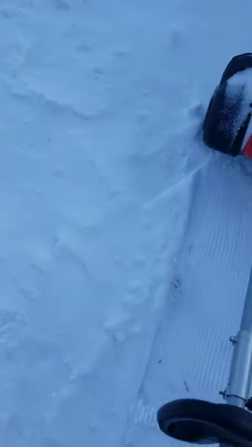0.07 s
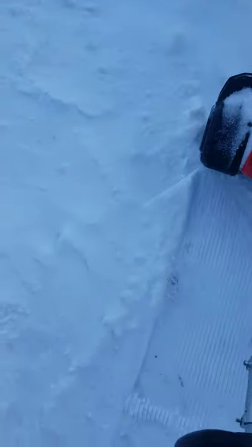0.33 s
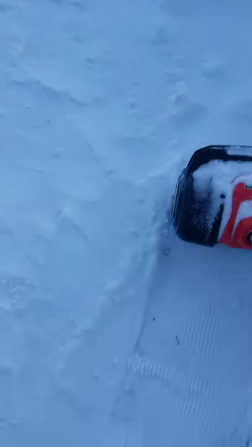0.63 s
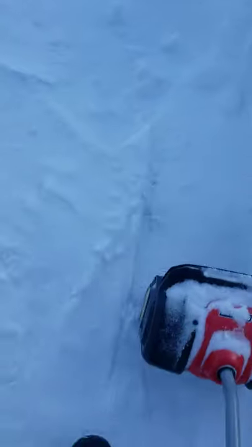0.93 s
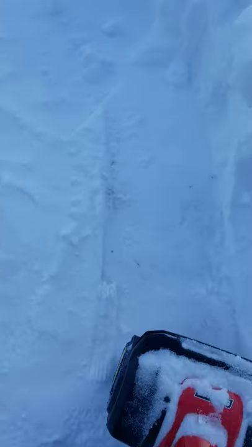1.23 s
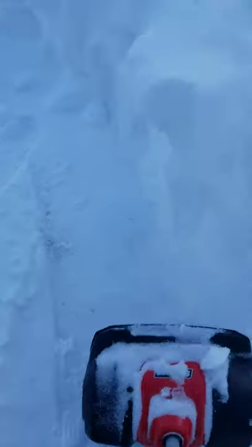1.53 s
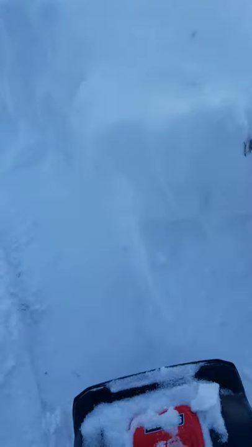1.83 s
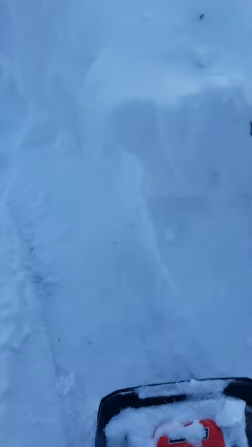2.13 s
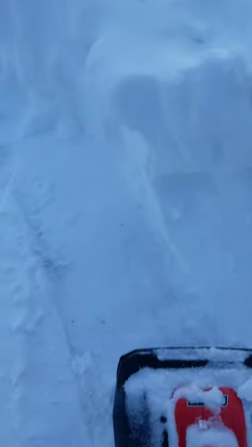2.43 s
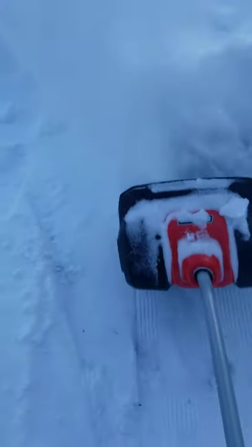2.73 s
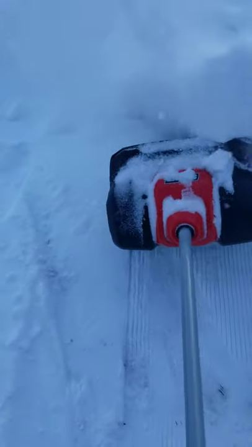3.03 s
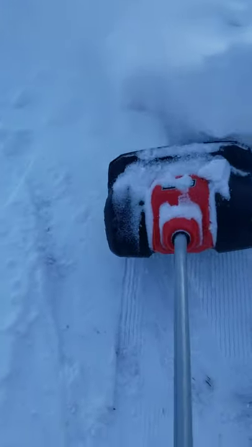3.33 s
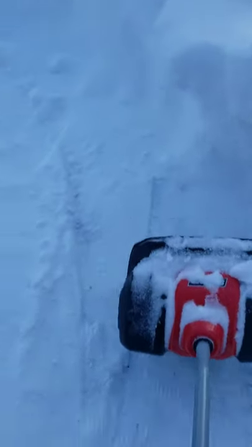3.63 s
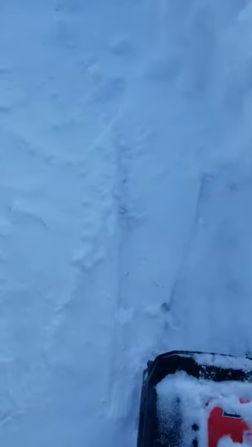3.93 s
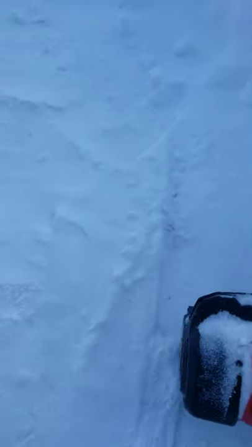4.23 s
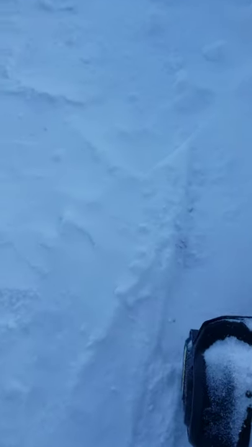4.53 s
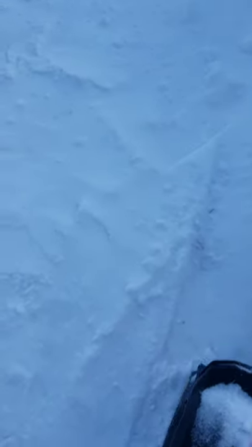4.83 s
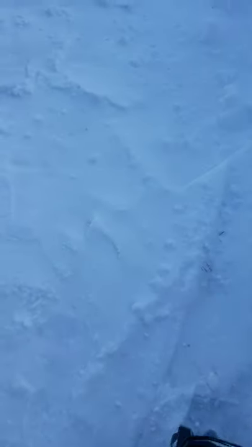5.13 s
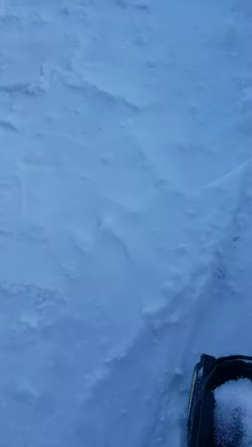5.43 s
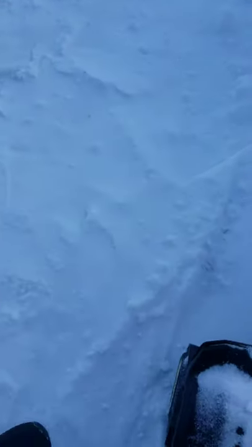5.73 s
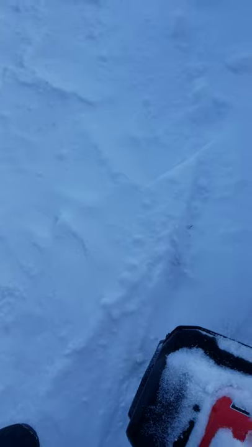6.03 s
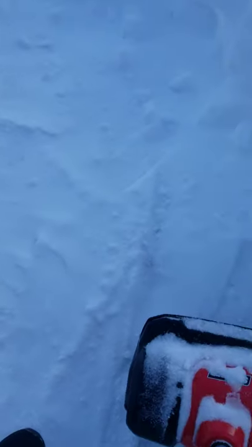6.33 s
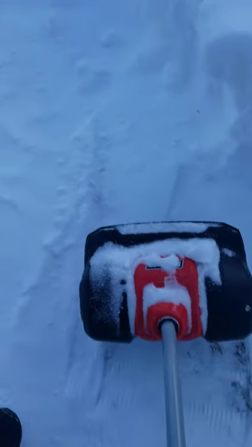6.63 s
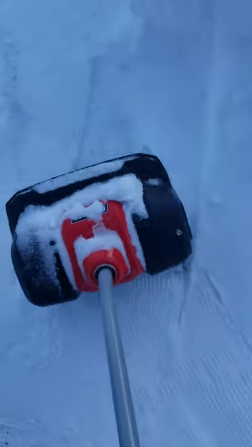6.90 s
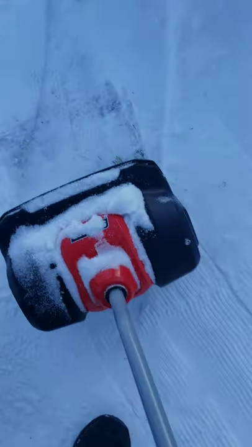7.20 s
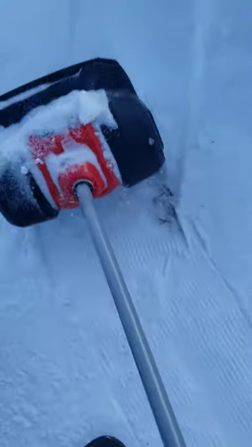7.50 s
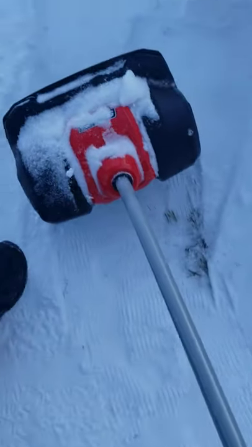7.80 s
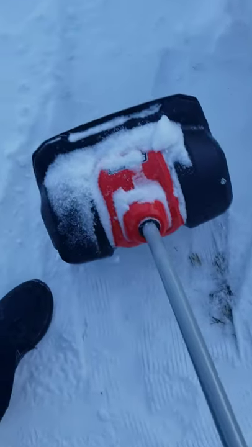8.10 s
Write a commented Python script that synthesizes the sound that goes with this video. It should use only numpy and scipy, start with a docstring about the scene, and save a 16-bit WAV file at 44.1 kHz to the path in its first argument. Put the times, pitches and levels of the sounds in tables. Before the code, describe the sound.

Close outdoors, a powered broom drones steadily while scraping snow in bursts, lumps thudding on its plastic hood and ice chips clicking.

```python
"""A motor hums and whines and a plastic hood rattles: an electric snow broom, close by in the open air.
It is pushed to and fro over a snowy path. On each push the bristles scrape, powder hisses out and lumps
drum on the hood, exciting its resonances. Ice chips clack, grit ticks and cold snow squeaks by stick-slip.
Once the head rams a snow bank and the hood booms; as the load drops, the motor races until its governor
pulls it back."""
import sys
import numpy as np
from scipy import signal
from scipy.io import wavfile
from scipy.ndimage import uniform_filter1d, map_coordinates

SR = 44100
rng = np.random.default_rng(int(sys.argv[2]) if len(sys.argv) > 2 else 0)


def persist_wave(psi):
    """Save psi, clipped to +-1, as 16-bit WAV."""
    counts = np.round(np.clip(psi, -1, 1) * 32767).astype(np.int16)
    wavfile.write(sys.argv[1], SR, np.atleast_2d(counts).T)


N = 359856
TIME = np.arange(N) / SR

# normal modes of the hood: pitch_hz, width_hz, gain_db
HOOD_MODES = [(125, 24.8, 1), (180.3, 59, 2), (237, 49, 0.5), (441, 26, -6.5), (555, 66.4, 2),
              (667.3, 123, 0.5), (895, 120, -5.5), (1110, 290, -11)]
# the brush bites into snow: start_s, rise_s, hold_s, scrape_db, spray_db, drumming_db
SNOW_BITES = [(0.0, 0.0051, 0.13, -56, -56, -29.5), (0.654, .12, 0.044, -39, -60, -43),
              (0.83, 0.033, .1, -47, -54.5, -42), (1.297, 0.045, .08, -33.5, -48.5, -32),
              (1.42, 0.035, 0.017, -28.5, -44.5, -22.5), (1.64, 0.02, 0.027, -43, -53, -32),
              (2.157, 0.019, .012, -34.5, -47, -45), (2.342, 0.063, .08, -37.5, -51, -32),
              (2.483, 0.027, 0.018, -27, -38, -23), (2.525, .02, 0.034, -25.5, -41, -30),
              (2.594, .02, 0.24, -35, -49, -26.5), (2.81, 0.045, .008, -31.5, -48, -18),
              (3.566, 0.14, 0.13, -39.5, -53.5, -38), (3.973, 0.087, 0.016, -28, -41, -24.5),
              (4.076, 0.047, 0.14, -33.5, -45.5, -35), (4.307, 0.033, 0.073, -34.5, -51, -35),
              (4.754, 0.044, 0.094, -40.5, -55, -56), (5.054, 0.13, 0.051, -32, -43, -31),
              (5.187, 0.095, 0.039, -25, -39.5, -21), (5.332, 0.019, 0.053, -27, -44.5, -26),
              (5.5, 0.021, 0.013, -35.5, -50, -29), (5.8, 0.12, 0.045, -38, -47, -42),
              (6.24, 0.038, .015, -37, -48.5, -42), (6.35, 0.014, 0.012, -41, -50, -45),
              (6.518, 0.013, 0.0067, -37.5, -53, -58), (6.785, 0.033, 0.043, -33.5, -49.5, -29.5),
              (6.926, 0.013, 0.009, -35.5, -46.5, -26.5), (7.257, 0.037, 0.059, -33.5, -50.5, -30),
              (7.364, 0.013, 0.014, -25, -39.5, -17.5), (7.432, 0.015, 0.049, -33, -44.5, -20.5),
              (7.515, 0.043, 0.068, -23.5, -39.5, -19.5), (7.702, 0.0079, 0.096, -32, -48.5, -31)]


def from_db(db):
    """Decibels to amplitude ratio."""
    return 10 ** (np.asarray(db) / 20)


def rms_one(x):
    """Normalisation: the centre of the stereo image gets rms 1."""
    return x / np.sqrt(np.mean(np.atleast_2d(x).mean(axis=0) ** 2) + 1e-20)


def in_time(rows):
    """Linear interpolation of each column of a curve, sample by sample."""
    times, *columns = np.transpose(rows)
    return [np.interp(TIME, times, column) for column in columns]


def at_hz(points, hz):
    """Interpolation of a spectrum on a log-frequency axis."""
    frequencies, levels = np.transpose(points)
    return np.interp(np.log(hz), np.log(frequencies), levels)


def drift(rate_hz):
    """Slow random fluctuation: low-passed noise of rms 1."""
    step = 40  # samples per control point
    pole = np.exp(-2 * np.pi * rate_hz * step / SR)
    slow = signal.lfilter([1], [1, -2 * pole, pole * pole], rng.standard_normal(N // step + 2002))[2000:]
    return np.interp(np.arange(N) / step, np.arange(len(slow)), rms_one(slow))


def cut(x, hz, kind, order=2):
    """Butterworth filter."""
    return signal.sosfilt(signal.butter(order, hz, kind, fs=SR, output="sos"), x + 1e-18)


def resonate(x, hz, width_hz):
    """A damped oscillator with gain 1 at resonance."""
    radius = np.exp(-np.pi * width_hz / SR)
    feedback = [1, -2 * radius * np.cos(2 * np.pi * hz / SR), radius * radius]
    return signal.lfilter(np.array([1, 0, -1]) * (1 - radius * radius) / 2, feedback, x + 1e-18)


def spread(pair, hz):
    """Mid and side become left and right: coherent in the bass, diffuse in the treble."""
    # stereo width: frequency_hz, side_gain_db
    width = [(60, -43), (170, -17.5), (350, -7), (700, -5), (1400, -6.5), (2800, -1.5), (6000, -1.5),
             (14000, 0.5)]
    # level difference between the ears: frequency_hz, left_minus_right_db
    balance = [(60, -4), (170, -1), (600, -1), (1400, -2.5), (5000, -0.5), (9500, 2), (14000, -0.5)]
    mid, side = pair
    signs = np.array([[1], [-1]])
    return (mid + from_db(at_hz(width, hz)) * side * signs) * from_db(at_hz(balance, hz) * signs / 2)


def body(force, modes):
    """Modal superposition: parallel resonances of alternating sign."""
    return sum((-1) ** k * from_db(db) * spread(resonate(force, hz, width), hz)
               for k, (hz, width, db) in enumerate(modes))


def coloured(force, spectrum, patchy_db):
    """Noise under a force envelope, shaped in third octaves that flicker independently; rms 1."""
    edges = 16000 / 2 ** (np.arange(28)[::-1] / 3)
    white = rng.standard_normal((2, 2, N)) * force
    out = 0
    for k, (low, high) in enumerate(zip(edges, edges[1:])):
        hz, flicker = np.sqrt(low * high), drift(10.4)
        if spectrum[0][0] < hz < 2 * spectrum[-1][0]:
            band = spread(cut(white[k % 2], [low, high], "band"), hz)
            out = out + band * from_db(at_hz(spectrum, hz) + patchy_db * flicker)
    return rms_one(out)


def grains(per_s, size_db, life_s, bed):
    """Shot noise: the force envelope of small random impacts over a steady bed."""
    hits = rng.random(N) < per_s / SR
    sizes = from_db(size_db * np.minimum(rng.exponential(1, N), 4))
    energy = signal.lfilter([1], [1, -np.exp(-2 / (life_s * SR))], hits * sizes ** 2 + 1e-18)
    return np.sqrt(energy / energy.mean() + bed)


def slaps(cycles, fade, depth, uneven_db):
    """Periodic impacts: the force jumps by a random amount once a cycle and relaxes; rms 1."""
    size = from_db(uneven_db * rng.standard_normal(int(cycles[-1]) + 1))[cycles.astype(int)]
    return rms_one(1 + depth * size * np.exp(-(cycles % 1) / fade))


def strokes(rows, release_s):
    """Incoherent sum: envelopes that rise, hold and decay add in power."""
    power = np.zeros(N)
    for start_s, rise_s, hold_s, level_db in rows:
        age = TIME - start_s
        attack = np.clip(age / max(rise_s, 1e-3), 0, 1)
        decay = np.exp(-np.clip((age - rise_s - hold_s) / release_s, 0, 30))
        power += (from_db(level_db) * attack * decay) ** 2
    return np.sqrt(power)


def burst(life_s):
    """Impact excitation: exponentially decaying noise on two channels."""
    age = np.arange(SR // 10) / SR
    return rng.standard_normal((2, len(age))) * np.exp(-age / life_s)


def add(out, start_s, peak_db, sound):
    """Mix a sound in at a time and peak level."""
    start = max(round(start_s * SR), 0)
    scaled = from_db(peak_db) * sound / np.abs(sound.mean(axis=0)).max()
    out[:, start:start + sound.shape[1]] += scaled[:, :N - start]


def hum(turns, orders, waver_db, wander):
    """Harmonics of a shaft's rotation, each randomly modulated in amplitude and phase."""
    out = np.zeros((2, N))
    for order, level_db in orders:
        phase = 2 * np.pi * (order * turns + rng.random()) + wander * np.sqrt(order) * drift(4.3)
        tone = np.sqrt(2) * from_db(level_db + waver_db * drift(20)) * np.sin(phase)
        out += spread([tone, 0], order * turns[-1] / TIME[-1])
    return out


def motor_speed():
    """Critical damping: the governor pulls the racing motor back without ringing."""
    # the load drops and the motor races: start_s, overshoot_hz
    races = [(-.014, 14.4), (2.9, 13.8)]
    speed_hz, governor_s = 140.2, .077
    for start_s, overshoot_hz in races:
        age = np.maximum(TIME - start_s, 0) / governor_s
        speed_hz = speed_hz + overshoot_hz * age * np.exp(1 - age)
    return speed_hz * (1 + 0.00143 * drift(4.25))


def drive(motor_turns, brush_turns, motor_db, drone_db):
    """Rotation radiates at multiples of shaft speed: motor hum, gear drone and the brush's throb."""
    # motor hum: cycles_per_motor_turn, level_db
    motor_orders = [(1, -3), (3, -20), (4, -12.5), (6, -40)]
    # gear drone: cycles_per_brush_turn, level_db
    gear_orders = [(4, -10), (8, -14.5), (13, -21.5), (17, -19), (18, -16), (19, -22), (20, -38),
                   (21, -10.5), (22, -13), (23, -10), (24, -13), (26, -18.5), (28, -18.5), (36, -25.5),
                   (38, -25.5)]
    # throb of the brush, twice a turn: time_s, level_db
    throb_curve = [(0, -32.5), (.7, -36.5), (1.0, -41), (2.4, -39.5), (2.92, -35), (3.05, -46), (3.28, -47),
                   (3.38, -38), (3.85, -41.5), (5.12, -42), (5.65, -36), (6.2, -39.5), (8.16, -37)]
    throb = from_db(in_time(throb_curve)[0] + 1.0) * np.sin(4 * np.pi * brush_turns)
    motor = from_db(motor_db) * hum(motor_turns, motor_orders, waver_db=2.5, wander=0.21)
    gears = from_db(drone_db + 0.5) * hum(brush_turns, gear_orders, waver_db=3.0, wander=0.089)
    return throb + motor + gears


def rattle(brush_turns, drone_db, load):
    """Backlash: play in the drive knocks the hood two and three times a turn, harder under load."""
    twice = slaps(2 * brush_turns, fade=0.33, depth=2.4, uneven_db=2.0)
    thrice = slaps(3 * brush_turns, fade=0.16, depth=1.58, uneven_db=3.5)
    knocks = rng.standard_normal((2, N)) * twice * thrice
    force = knocks * grains(per_s=620, size_db=2.4, life_s=0.00094, bed=1.0)
    hood = cut(cut(body(force, HOOD_MODES), 103.0, "high", order=4), 1060, "low")
    return np.hypot(from_db(drone_db - 2.0), load) * rms_one(hood)


def whine(motor_turns, scrape):
    """A high motor harmonic: a thin, fluttering whine, wide between the ears, that weakens under load."""
    # the whine's harmonic: cycles_per_motor_turn, level_db
    orders = [(28, 0)]
    # whine under light load: time_s, level_db
    whine_curve = [(0, -72), (.3, -65), (.7, -72), (2.85, -71), (3.0, -67), (3.22, -64.5), (3.4, -73),
                   (3.9, -71), (4.4, -65), (6.1, -63.5), (6.8, -67), (8.0, -63.5)]
    # higher whine as the head leaves the snow: start_s, rise_s, hold_s, level_db
    free_spin = [(3.0, .15, .22, -72)]
    light_load_db = -42  # a scrape above this weakens the whine
    flutter = rms_one(from_db(2.0 * drift(60) + 1.5 * drift(5)))
    centre, side = (hum(motor_turns, orders, waver_db=1.5, wander=.3) for _ in range(2))
    load_gain = np.maximum(scrape / from_db(light_load_db), 1) ** -.45
    steady = from_db(in_time(whine_curve)[0]) * load_gain * (centre + side * np.array([[.5], [-.5]]))
    unloaded = strokes(free_spin, release_s=.07) * hum(motor_turns, [(30, 0)], waver_db=1.5, wander=.3)
    return flutter * (steady + unloaded)


def brushwork():
    """Envelopes of scrape, spray and load: skimming, thinned at each lift, adds in power to the bites."""
    # the brush skims swept ground: time_s, scrape_db, spray_db
    skim = [(0, -54, -59), (.3, -52, -58.5), (.45, -46, -57), (1.1, -41.5, -54), (2.1, -43, -55),
            (2.85, -40.5, -50), (2.97, -45, -61), (3.15, -51.5, -70), (3.4, -44, -58.5), (4.7, -44, -56.5),
            (5.7, -39.5, -55.5), (6.35, -37.5, -58.5), (7.1, -41, -55), (8.16, -40, -57)]
    # the head lifts between strokes: centre_s, half_length_s
    lifts = [(1.252, 0.053), (2.34, 0.013), (3.942, 0.016), (5.057, 0.0079), (6.11, 0.017), (6.416, .015),
             (6.653, 0.12), (7.214, 0.021), (7.994, 0.042)]
    release_s = .04  # the brush clears itself
    lifted = sum(np.exp(-((TIME - centre_s) / half_s) ** 2) for centre_s, half_s in lifts)
    scrape_db, spray_db = in_time(skim)
    load = strokes([(*timing, db) for *timing, db, _, _ in SNOW_BITES], release_s)
    thrown = strokes([(*timing, db) for *timing, _, db, _ in SNOW_BITES], release_s)
    scrape = np.hypot(from_db(scrape_db - 9.5 * lifted), load)
    spray = np.hypot(from_db(spray_db - 10 * lifted), thrown)
    return scrape, spray, load


def bristles(brush_turns, scrape, spray):
    """Friction and impact noise: bristle rows scratch the crust, pelt the hood's lip and fling powder."""
    # spectrum of the scraped crust: frequency_hz, density_db
    crust_spectrum = [(100, -5), (300, 10), (550, 9), (800, 5), (1000, 7), (1350, -1.5), (1750, -0.5),
                      (2150, -1.5), (2800, -7.5), (4000, -14), (6000, -38), (8000, -47), (15000, -19)]
    # modes of the hood's lip: pitch_hz, width_hz, gain_db
    lip_modes = [(1040, 146, 2), (1330, 86, 6.5), (1430, 260, 3.5), (2061, 144, 5.5), (2125, 340, 1)]
    # spectrum of the powder's hiss: frequency_hz, density_db
    powder_spectrum = [(3000, 5.5), (4600, 1), (6200, -1.5), (7200, -8), (8200, -5), (9600, -4.5),
                       (12200, 5.5), (14500, -8.5), (16000, -3)]
    grip = from_db(0.49 * drift(39))
    rows = grip * slaps(2 * brush_turns, fade=0.19, depth=0.14, uneven_db=8.5)
    crunch = rows * grains(per_s=200, size_db=4.0, life_s=0.012, bed=0.31)
    crystals = grip * grains(per_s=580, size_db=3.0, life_s=0.0034, bed=1.1)
    pellets = rng.standard_normal((2, N)) * rows * grains(per_s=160, size_db=4.0, life_s=0.0059, bed=0.8)
    crust = scrape * from_db(-1.18) * coloured(crunch, crust_spectrum, patchy_db=2.55)
    lip = scrape * from_db(-7.5) * rms_one(cut(body(pellets, lip_modes), 2550, "low"))
    powder = spray * from_db(-1.13) * coloured(crystals, powder_spectrum, patchy_db=2.0)
    return crust + lip + powder


def drumming():
    """Dense impacts of snow lumps on the hood merge into low noise during each bite."""
    # spectrum of the pelted hood: frequency_hz, density_db
    spectrum = [(40, -16), (80, -11), (130, 5), (200, 6), (250, 5.5), (330, -25), (440, -15), (650, -29),
                (1000, -10), (2500, -79)]
    lumps = grains(per_s=370, size_db=2.1, life_s=0.00036, bed=0.48)
    envelope = strokes([(*timing, db) for *timing, _, _, db in SNOW_BITES], release_s=0.035)
    return from_db(-3.5) * envelope * coloured(lumps, spectrum, patchy_db=2.0)


def air():
    """A faint rush of air: broadband noise, strongest in the bass."""
    # spectrum of the rush: frequency_hz, density_db
    spectrum = [(25, -9), (60, -9.5), (110, 1.5), (300, -1), (1000, -11), (2500, -29), (15000, -54)]
    return from_db(-42.5) * coloured(1, spectrum, patchy_db=3.0)


def ice_chips():
    """Free vibration: chips strike the plastic and ring briefly, each at its own pitch."""
    # chip impacts: start_s, level_db, pitch_hz
    chips = [(1.0682, -25, 1390),  (2.5045, -24, 1330), (3.145, -37.5, 2150), (5.395, -29, 1220),
             (5.969, -29, 1230), (6.77, -29.5, 1800), (6.8022, -19.5, 1170), (7.388, -19, 1340),
             (7.4463, -23, 1220), (7.4836, -24, 1240), (7.5357, -14.5, 1330), (7.7137, -22, 1460),
             (7.8027, -25, 1300), (8.089, -29, 1670)]
    out = np.zeros((2, N))
    for start_s, level_db, pitch_hz in chips:
        ring = resonate(resonate(burst(life_s=0.006), pitch_hz, 170), pitch_hz, 1500)
        add(out, start_s, level_db + 0.5, spread(ring, pitch_hz))
    return out


def grit():
    """Brief impacts have broad spectra: grit flicked by the bristles gives bright ticks."""
    # the largest pieces: start_s, level_db
    coarse = [(1.0693, -30), (1.382, -20.5), (1.538, -31), (1.578, -29), (1.688, -27), (1.716, -28),
              (2.527, -12.5), (5.8743, -29), (6.0077, -25), (6.04, -32), (6.1314, -30), (6.1387, -30),
              (6.197, -28), (6.231, -25), (6.477, -31), (6.568, -41), (6.8005, -29), (6.87, -21),
              (7.4829, -20.5), (7.682, -23), (7.714, -23), (7.848, -23.5)]
    bare_from_s, flicks_per_s = 5.8, 8.8  # finer grit flies once the ground is swept bare
    flicks = TIME[(rng.random(N) < flicks_per_s / SR) & (TIME > bare_from_s)]
    fine = [(start_s, -32 - 3 * rng.standard_normal()) for start_s in flicks]
    out = np.zeros((2, N))
    for start_s, level_db in coarse + fine:
        crack = burst(life_s=0.0046)
        tick = resonate(crack, 2700, 1800) - 0.65 * resonate(crack, 16000, 2700)
        add(out, start_s, level_db - 6.5, tick)
    return out


def clods():
    """Single clods excite the hood's modes; the harder the clod, the wider the force's bandwidth."""
    # clod impacts: start_s, level_db, hardness_hz
    impacts = [(2.512, -4.5, 159), (2.79, -13, 229), (2.905, -22, 207), (4.052, -4, 172),
               (4.223, -10.5, 150), (5.355, -7, 600), (5.39, -2, 800), (6.872, -8, 420), (6.957, -6.5, 130),
               (7.388, -1, 190), (7.533, -3, 135), (7.583, -11, 300)]
    damped = [(hz, 2.0 * width, db) for hz, width, db in HOOD_MODES]  # pressed snow shortens the ring
    out = np.zeros((2, N))
    for start_s, level_db, hardness_hz in impacts:
        force = cut(burst(life_s=0.0022), 1.45 * hardness_hz, "low")
        add(out, start_s, level_db - 8.5, cut(body(force, damped), 118, "high"))
    return out


def jam():
    """Forced vibration: jammed snow grinds steadily on the hood and makes it boom."""
    # modes of the snow-packed hood: pitch_hz, width_hz, gain_db
    jammed_modes = [(96, 31, -7.5), (167, 74, 2.5), (213.4, 26.3, 10), (447, 150, -10.5)]
    # the head rams the snow bank: start_s, rise_s, hold_s, level_db
    rams = [(2.778, 0.017, 0.033, -15), (2.835, 0.024, 0.059, -12.5), (2.985, .02, 0.0099, -24.5)]
    grinding = cut(rng.standard_normal((2, N)), 830, "low")
    boom = cut(body(grinding, jammed_modes), 67, "high")
    running_rms = np.sqrt(uniform_filter1d(boom.mean(axis=0) ** 2, size=700) + 1e-18)
    return from_db(-0.5) * strokes(rams, release_s=0.016) * boom / running_rms


def squeaks():
    """Stick-slip friction: cold crystals sing in two narrow bands."""
    # snow squeaks: start_s, peak_db, lower_hz, upper_hz, length_s
    events = [(4.782, -32.5, 1990, 3780, 0.017), (5.837, -39, 3820, 6100, 0.049),
              (7.674, -33, 3500, 4520, 0.016)]
    out = np.zeros((2, N))
    for start_s, peak_db, lower_hz, upper_hz, length_s in events:
        window = np.hanning(round(length_s * SR))
        slips = rng.standard_normal((2, len(window))) * window
        squeak = sum(resonate(resonate(slips, hz, 350), hz, 700) for hz in (lower_hz, upper_hz))
        add(out, start_s, peak_db, squeak)
    return out


def place(x):
    """Interaural time difference: the sound reaches the nearer ear first."""
    # bearing of the broom's head: time_s, right_ear_lead_us
    bearing = [(0, -120), (.4, -120), (1.2, 135), (2.2, 180), (2.9, 10), (3.3, 10), (3.8, 90), (4.3, 100),
               (4.8, 180), (6.3, 170), (7.2, -130), (8.16, -90)]
    half_lag = in_time(bearing)[0] * 1e-6 * SR / 2
    return np.array([map_coordinates(side, [np.arange(N) + sign * half_lag], order=3)
                     for side, sign in zip(x, (-1, 1))])


def scene():
    """Superposition of the machine and the snow it throws, moving from side to side, and the air."""
    # strength of the running gear: time_s, motor_db, drone_db
    running = [(0, -31, -37.5), (.5, -35, -37.5), (1.0, -35, -33.5), (2.4, -37.5, -31), (3.05, -31, -36.5),
               (3.45, -36.5, -37.5), (4.1, -34, -33.5), (4.6, -35.5, -34.5), (5.05, -40.5, -33),
               (5.6, -31.5, -31.5), (7.1, -35.5, -31.5), (8.16, -29, -32)]
    gear_ratio = 4.625
    motor_turns = np.cumsum(motor_speed()) / SR
    brush_turns = motor_turns / gear_ratio
    scrape, spray, load = brushwork()
    motor_db, drone_db = in_time(running)
    machine = drive(motor_turns, brush_turns, motor_db, drone_db) + rattle(brush_turns, drone_db, load)
    snow = drumming() + jam() + clods() + bristles(brush_turns, scrape, spray) + squeaks()
    return air() + whine(motor_turns, scrape) + place(machine + snow + ice_chips() + grit())


def record(dry):
    """Band limiting: an elliptic low-pass cuts the highest treble steeply."""
    cutoff_hz = 15900
    return signal.sosfilt(signal.ellip(10, .1, 90, cutoff_hz, fs=SR, output="sos"), dry)


dry = scene()
out = record(dry)
persist_wave(out)
```